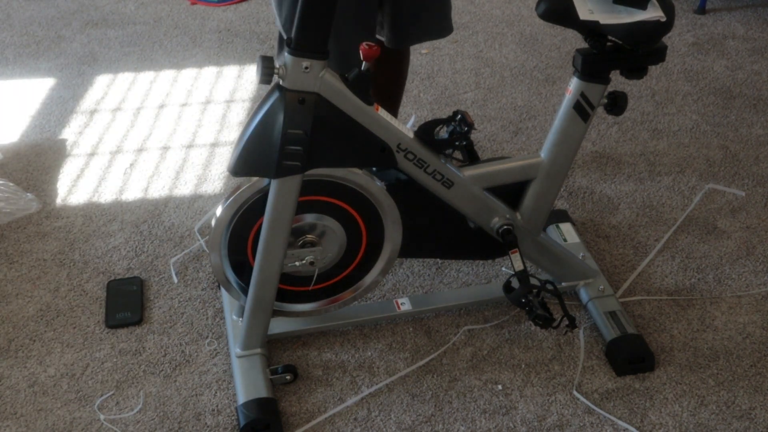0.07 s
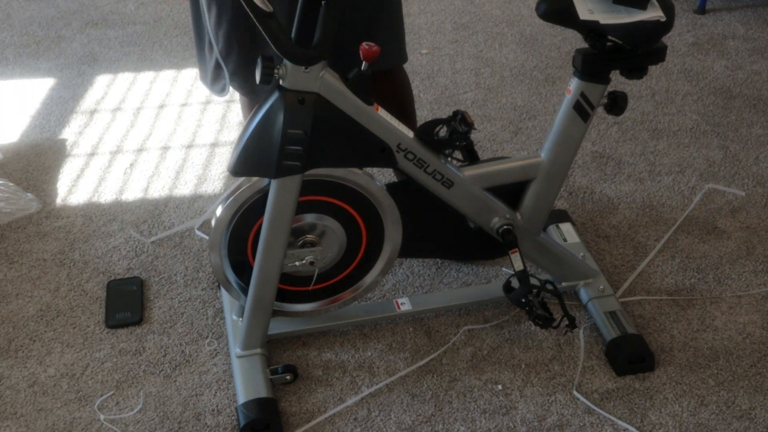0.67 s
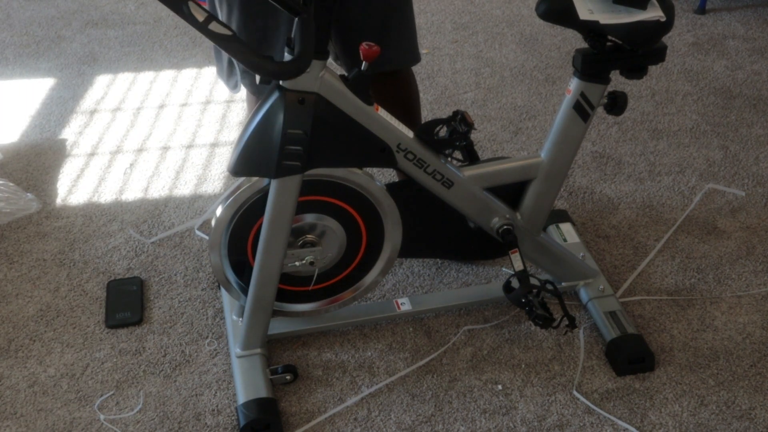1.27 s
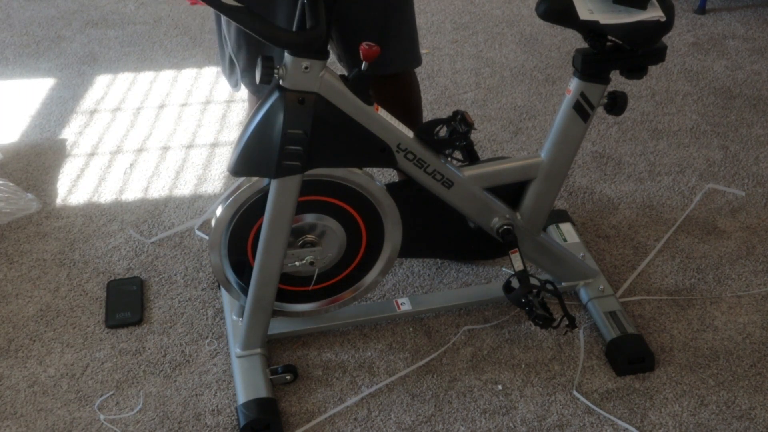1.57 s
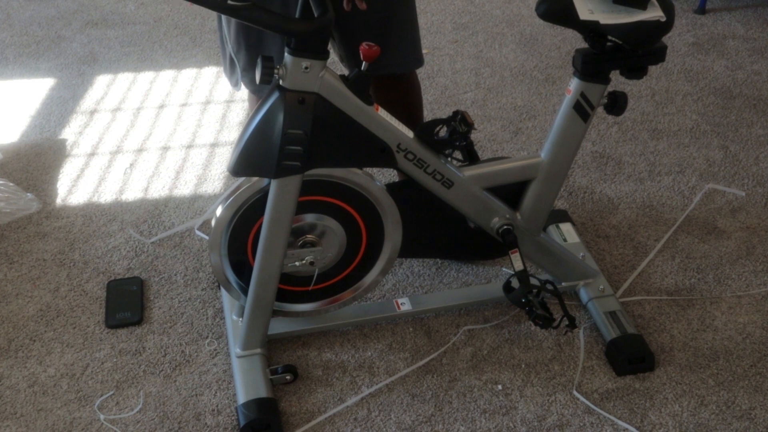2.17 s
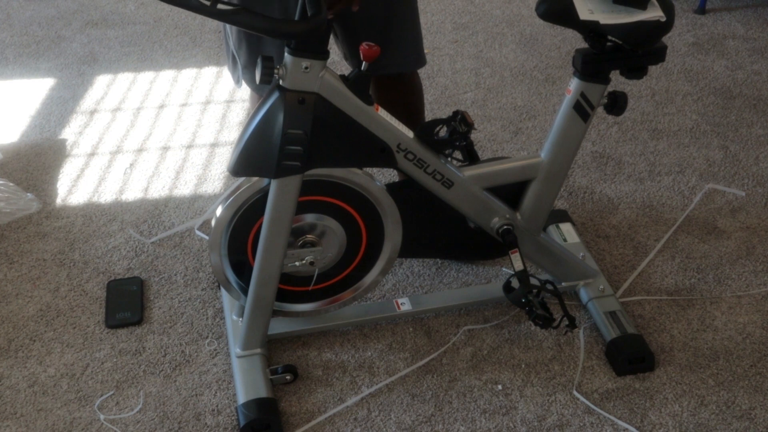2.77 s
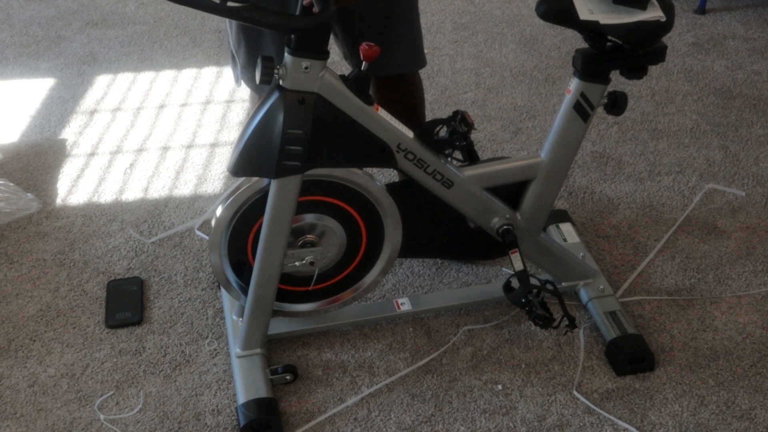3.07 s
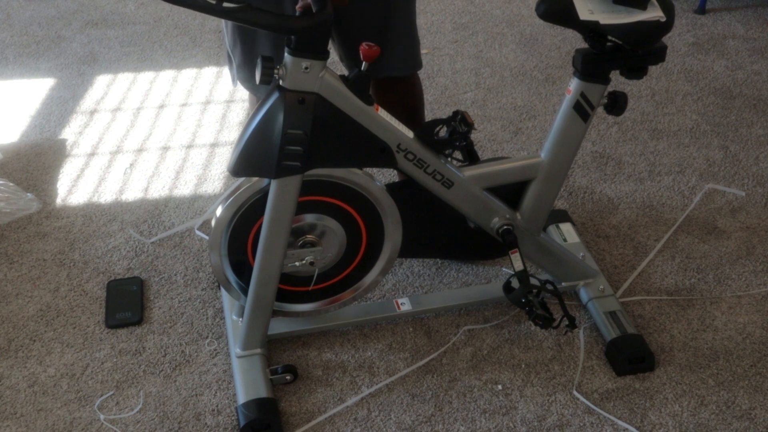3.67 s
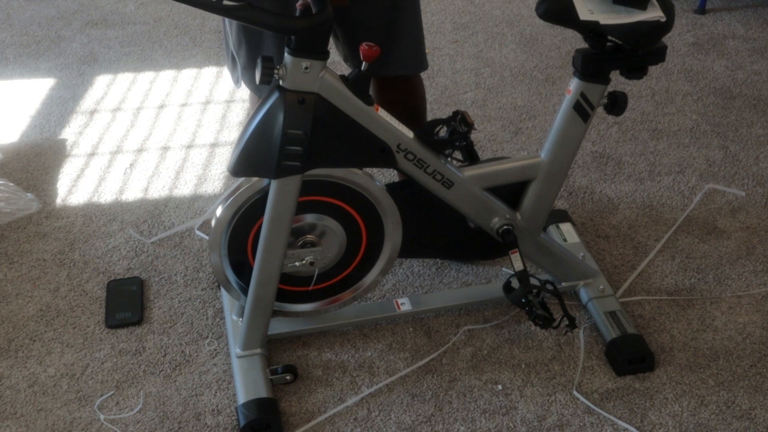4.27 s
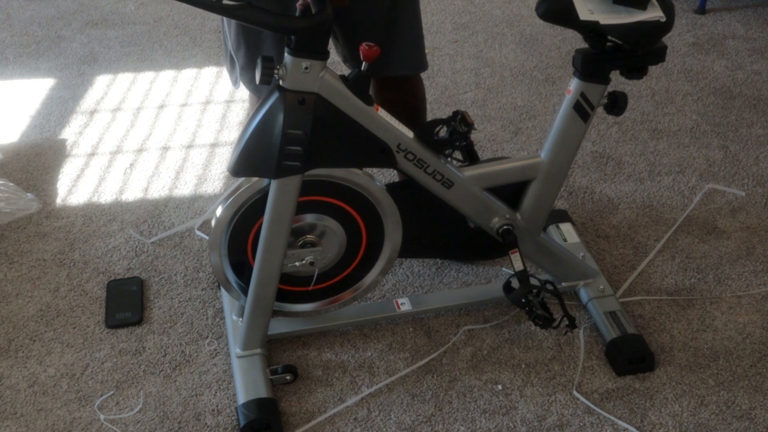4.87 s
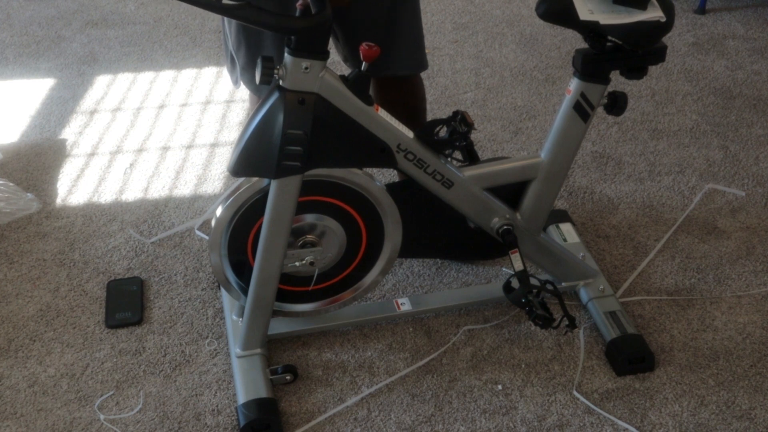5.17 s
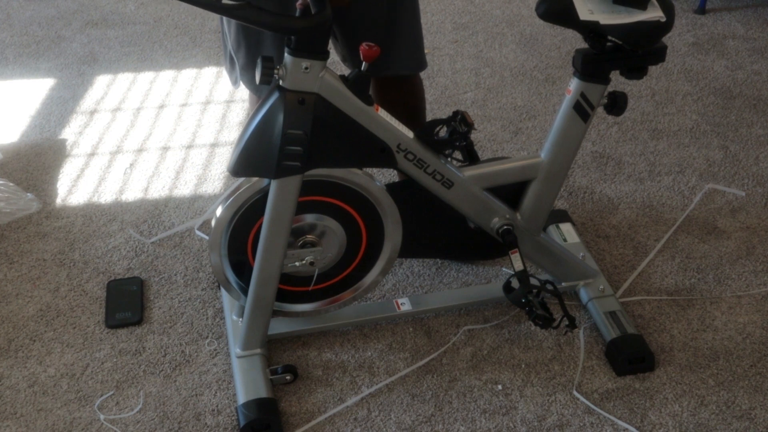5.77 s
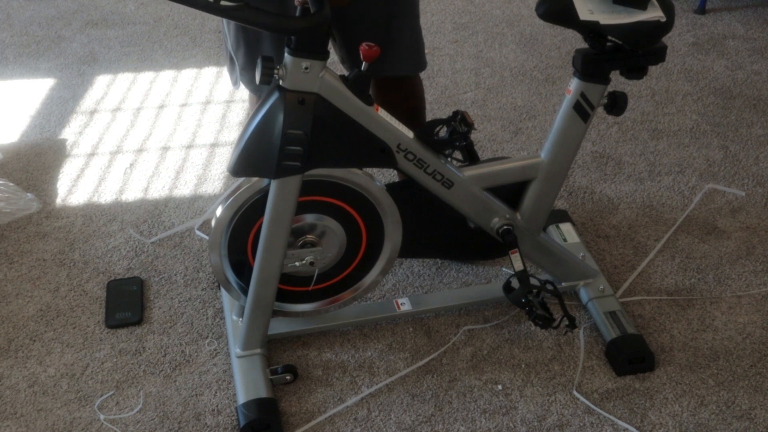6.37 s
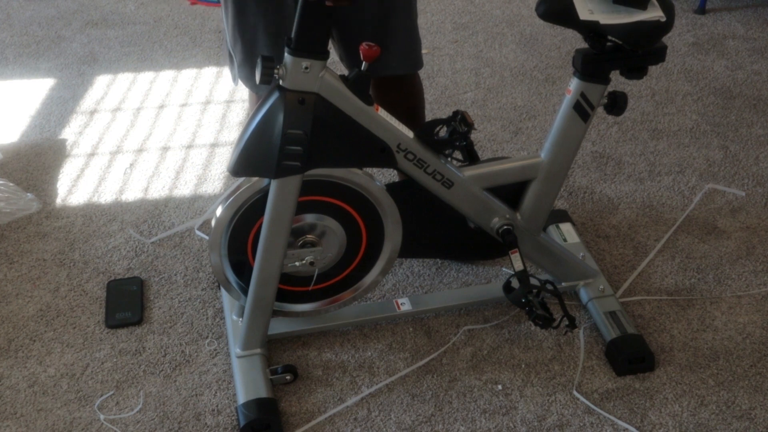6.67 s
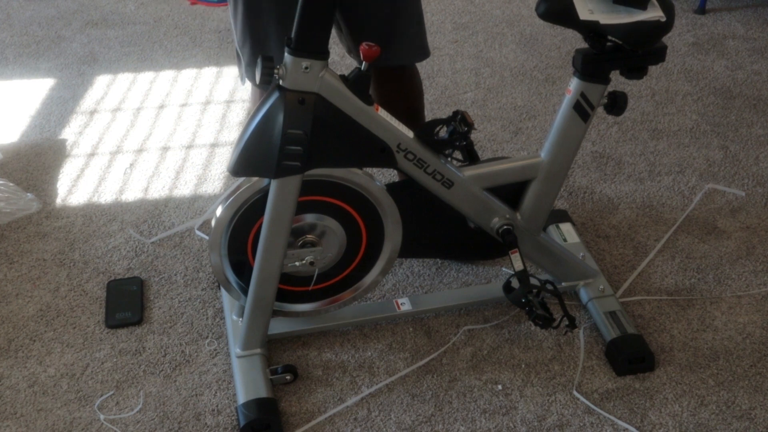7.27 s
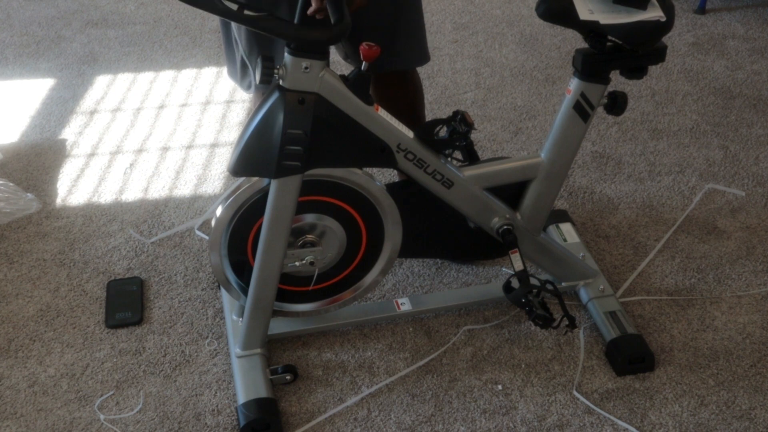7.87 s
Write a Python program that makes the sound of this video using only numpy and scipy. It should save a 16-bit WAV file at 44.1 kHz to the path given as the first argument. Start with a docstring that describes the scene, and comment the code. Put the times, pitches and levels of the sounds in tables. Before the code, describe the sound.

A handlebar post is fitted into an exercise bike's steel frame in a carpeted room, fairly quiet and near. Light knocks and a brief rub open, with a small clink at about 0.8 seconds. Soft, hollow bumps on plastic covers follow from 1.1 to 2.5 seconds. Around 3 seconds the post chatters in its tube, each clack sitting on a thud. Sharp, pitched taps on the rim stand out between 3.5 and 3.8 seconds. More knocks, short gritty scrapes and a brief sliding hiss follow, with bright clacks and small steel pings from 4.7 to 5.2 seconds. A dull bump and a scraping double knock come near 6 seconds, two more knocks near 7, then a thin ping and faint last touches until 8. Underneath are a soft deep rumble and low handling noise, with a very faint wavering hum around 1.7 and 6.5 seconds.

```python
"""Knocks, chatter and rubbing: a handlebar post is fitted into the steel frame of an exercise bike.
Each contact rings the frame's modes; the post sticks and slips in its tube and taps the rim.
Small steel fittings ping, a loose part clinks, hands bump the plastic covers. The room is carpeted.
Underneath: a deep rumble, the murmur of handling and a faint hum that comes and goes."""
import sys
import numpy as np
from scipy import signal
from scipy.fft import rfft, irfft, next_fast_len
from scipy.io import wavfile
from scipy.ndimage import uniform_filter1d

SR = 44100
rng = np.random.default_rng(int(sys.argv[2]) if len(sys.argv) > 2 else 0)


def digitize_waveform(pressure):
    """Quantize a signal to 16-bit integers and store it at the path in sys.argv[1].

    Rows of a 2-D input are taken as channels; values are limited to [-1, 1].
    """
    field = np.atleast_2d(pressure).T
    bounded = np.clip(field, -1, 1)
    quanta = np.round(bounded * 32767).astype(np.int16)
    wavfile.write(sys.argv[1], SR, quanta)


N = 353726
TAIL = SR // 2   # samples per blow or echo tail
AGE_S = np.arange(TAIL) / SR
TIME_S = np.arange(N) / SR

# steel-on-steel contact spectrum: freq_hz, gain_db
CONTACT_SPECTRUM = [(200, -19.5), (500, -15.5), (730, -2), (1000, -1), (1600, -4.5), (2100, -3), (3000, -2),
                    (4500, -7.5), (6500, -8.5), (12000, -35)]


def knocks(spots):
    """The post knocks in its tube and shakes the frame: a clack on top of a thud."""
    # start_s, clack_db, edge_hz, part_hz, wet_db, thud_db, thud_hz
    blows = [(0.056, -55.5, 2180, 980, -1.5, -53.5, 475), (0.078, -58, 2170, 945, 3, -59, 430),
             (0.556, -65.5, 2080, 1950, 11, -50.5, 290), (0.604, -68.5, 2070, 900, 5, -64.5, 395),
             (1.251, -75, 1900, 1450, 3.5, -62, 330), (1.933, -71.5, 3230, 1600, 12, -74.5, 338),
             (2.157, -63.5, 3160, 2730, 13.5, -57, 350), (2.364, -54.5, 2190, 1960, 1.5, -51, 400),
             (2.470, -62.5, 2340, 1900, 5, -48, 280), (2.841, -63.5, 1810, 800, 8, -60.5, 280),
             (2.906, -50, 1670, 1080, 10, -51.5, 357), (2.936, -43, 3520, 1010, -0.5, -49.5, 300),
             (3.006, -49.5, 2000, 980, -1.5, -49.5, 290), (3.044, -51, 2380, 970, 4, -48, 360),
             (3.095, -57.5, 2304, 930, 0, -55.5, 280), (3.401, -64, 2280, 1720, 4.5, -54, 263),
             (3.523, -52, 3030, 1830, 2.5, -49, 352), (3.678, -46, 3390, 1580, 11, -46.5, 320),
             (3.769, -44.5, 5800, 1670, -3.5, -54, 409), (3.968, -60.5, 2560, 1740, 2, -58.5, 345),
             (4.076, -51.5, 1840, 1365, 4.5, -51.5, 359), (4.302, -51, 3270, 820, 2, -51, 458),
             (4.719, -47.5, 3520, 1500, -1.5, -46.5, 400), (4.776, -44, 4140, 1460, 1, -59, 500),
             (4.798, -48, 3270, 1500, 1, -48.5, 456), (4.848, -55, 5700, 3410, 1, -47, 362),
             (5.061, -53.5, 5170, 2460, 10, -46, 407.4), (5.094, -43.5, 6300, 1750, -2, -49.5, 244),
             (5.165, -53, 2580, 1160, 3, -65.5, 260), (5.197, -40, 4560, 2100, -5.5, -60.5, 390),
             (5.218, -51.5, 4540, 2000, -1, -66.5, 280), (5.44, -55, 1550, 1245, -2.5, -63.5, 448),
             (6.067, -44, 4200, 1570, -3.5, -45, 472), (6.085, -47.5, 4000, 1130, 4, -51, 490),
             (6.843, -54, 2550, 1080, 7, -44, 390), (7.004, -43.5, 3200, 1600, 0, -50, 417),
             (7.322, -63, 4540, 1400, 15, -54, 527), (7.715, -70.5, 1200, 1040, -2, -69, 440),
             (7.989, -66, 1075, 980, -1, -80, 300)]
    out = np.zeros(N)
    for start_s, clack_db, edge_hz, part_hz, wet_db, thud_db, thud_hz in blows:
        hard = clack(spots, edge_hz, part_hz, ring_db=10, wet_db=wet_db)
        add(out, start_s - .001, from_db(clack_db) * hard)
        add(out, start_s - .002, from_db(thud_db) * thud(spots, thud_hz))
    return out


def clack(spots, edge_hz, part_hz, ring_db, wet_db, t60_s=.013, part_width_hz=380):
    """A clack rings the struck part and the frame; a steep low-pass makes it duller or brighter."""
    crunch = colour(contact(t60_s), CONTACT_SPECTRUM, ripple_db=3.5)
    part = resonance(crunch, part_hz, part_width_hz, ring_db)
    rung = cut(frame(part), edge_hz, "low", order=10)
    return attack_one(in_room(rung, wet_db, spots))


def thud(spots, pitch_hz, t60_s=.049, span_ratio=1.427, wet_db=4.5, boom_hz=137, boom_t60_s=.19):
    """Hollow answer of frame and covers; deep thuds stir the lowest bending mode, the boom, most."""
    hollow = cut(frame(contact(t60_s)), pitch_hz * span_ratio, "low", order=5)
    hollow = cut(hollow, pitch_hz / span_ratio, "high", order=3)
    boom = np.sin(2 * np.pi * boom_hz * AGE_S) * decay(boom_t60_s, -2)
    return attack_one(in_room(hollow, wet_db, spots)) + (2 * boom_hz / pitch_hz) ** 2 * boom


def contact(t60_s, rise_s=.0005):
    """Rough surfaces meet in a short crunch of noise."""
    return rng.standard_normal(TAIL) * decay(t60_s) * onset(rise_s)


def frame(x):
    """Whatever touches the tubes sounds through their modes."""
    # freq_hz, width_hz, boost_db
    modes = [(147, 60, 15), (219, 71, -1.25), (360, 23, 3.5), (447, 14, 6), (637, 22, 8.5), (948, 6, 7.5),
             (1140, 130, 6), (1503, 220, 6.5), (1780, 42, 4.5), (1983, 220, 3), (2580, 40, 5.5),
             (2567, 71, 2.5), (3135, 45, 5), (3240, 99, 2)]
    for freq_hz, width_hz, boost_db in modes:
        x = resonance(x, freq_hz, width_hz, boost_db)
    return x


def taps(spots, firm_db=-36, firm_edge_hz=3430, db_per_octave=27):
    """The post taps the tube's rim: dry, pitched, brighter with force, hardly shaking the frame."""
    # start_s, level_db, pitch_hz
    rim_taps = [(3.467, -48, 1790), (3.549, -35, 1906), (3.635, -48.5, 1605), (3.749, -41, 1720),
                (4.002, -58.5, 1445), (4.997, -62, 1610)]
    out = np.zeros(N)
    for start_s, level_db, pitch_hz in rim_taps:
        edge_hz = firm_edge_hz * 2 ** ((level_db - firm_db) / db_per_octave)
        rim = clack(spots, edge_hz, pitch_hz, ring_db=28, wet_db=-8, t60_s=.026, part_width_hz=180)
        shake = from_db(-16) * thud(spots, pitch_hz=420)
        add(out, start_s - .001, from_db(level_db) * (rim + shake))
    return out


def rubs(spots, bind_trim_db=-1.5):
    """The post rubs hollowly where it binds and hisses where it slides freely; the first row is no bind but a
    brief gritty burst with the same sound that opens the scene."""
    # start_s, end_s, relative_db, low_hz, high_hz
    binds = [(0, 0.031, -70, 900, 3400), (0.037, 0.126, -61, 797, 2230), (2.349, 2.394, -59, 885, 2270),
             (2.822, 2.90, -67, 1290, 1840), (2.926, 2.956, -49, 1600, 2600),
             (3.648, 3.79, -48.5, 1100, 3080), (3.805, 3.968, -69, 960, 2017),
             (3.954, 4.245, -62, 1163, 1750), (4.286, 4.32, -57.5, 900, 2640),
             (4.686, 4.815, -55.5, 1160, 3420), (4.826, 5.09, -69, 1080, 2040),
             (5.428, 5.462, -65.5, 1020, 2060), (5.645, 5.847, -67, 1100, 2020),
             (6.047, 6.106, -48.5, 892, 3680), (6.831, 6.877, -55, 800, 2040),
             (6.93, 7.03, -62, 1130, 1880), (7.351, 7.484, -69, 1232, 1600),
             (7.596, 7.669, -80.5, 1370, 3500)]
    # start_s, end_s, level_db
    slides = [(3.662, 3.79, -67), (4.764, 4.962, -61), (5.759, 5.847, -81), (6.038, 6.106, -63),
              (7.306, 7.386, -71)]
    out = np.zeros(N)
    for start_s, end_s, relative_db, low_hz, high_hz in binds:
        rub = stick_slip(spots, end_s - start_s, low_hz, high_hz, slips_per_s=410, wet_db=-3)
        add(out, start_s, from_db(relative_db + bind_trim_db) * rub)
    for start_s, end_s, level_db in slides:
        hiss = stick_slip(spots, end_s - start_s, low_hz=3080, high_hz=11500, slips_per_s=340, wet_db=0)
        add(out, start_s, from_db(level_db) * hiss)
    return out


def stick_slip(spots, duration_s, low_hz, high_hz, slips_per_s, wet_db, grit_db=4.5, ring_db=7.5):
    """Tube on tube sticks and slips: uneven clicks ring the hollow tube and the frame; rms 1."""
    # freq_hz, width_hz, relative_db
    tube_modes = [(1250, 53, 1.5), (1495, 94, -3.5), (1800, 26, -2)]
    length = max(round(duration_s * SR), SR // 100)
    sizes = from_db(grit_db * np.minimum(rng.exponential(1, length), 3)) * rng.choice([-1, 1], length)
    slips = sizes * (rng.random(length) < slips_per_s / SR)
    friction = (slips + .072 * rng.standard_normal(length)) * signal.windows.tukey(length, .5)
    scrape = colour(np.pad(friction, (0, TAIL)), CONTACT_SPECTRUM, ripple_db=3.5)
    for freq_hz, width_hz, relative_db in tube_modes:
        scrape = resonance(scrape, freq_hz, width_hz, ring_db + relative_db)
    scrape = cut(frame(scrape), low_hz, "high", order=5)
    scrape = cut(scrape, high_hz, "low", order=10)
    sound = in_room(scrape, wet_db, spots)
    return sound / np.std(sound[:length])


def bumps(spots, nudge_count=7, nudge_from_s=1.42, nudge_span_s=.9, nudge_db=-60, nudge_hz=305):
    """Soft blows and a run of light nudges on the plastic covers: thuds with a trace of clack."""
    # start_s, level_db, pitch_hz
    blows = [(0.558, -47, 243), (1.149, -49, 268), (1.224, -47, 311), (1.285, -44.5, 288),
             (1.325, -55.5, 327), (2.386, -50.5, 364), (2.459, -39.5, 271), (5.902, -38.5, 350),
             (5.957, -47.5, 210)]
    out = np.zeros(N)
    slots = np.arange(nudge_count) + rng.random(nudge_count)
    starts_s = nudge_from_s + nudge_span_s * slots / nudge_count
    nudges = [(start_s, rng.normal(nudge_db, 2.5), nudge_hz) for start_s in starts_s]
    for start_s, level_db, pitch_hz in blows + nudges:
        touch = from_db(-31) * clack(spots, edge_hz=900, part_hz=810, ring_db=5, wet_db=2.5)
        cover = thud(spots, pitch_hz, t60_s=.04, span_ratio=1.18, wet_db=2)
        add(out, start_s - .002, from_db(level_db) * (cover + touch))
    return out


def pings(spots, trim_db=-7, max_t60_s=.14):
    """Steel fittings tick and ring with the modes near one pitch; fingers limit the ring time."""
    # start_s, relative_db, centre_hz, spread_octaves, tick_re_ring_db
    touches = [(0.603, -72, 3830, .5, -16), (1.186, -60.5, 10670, 0.072, -1), (1.253, -63, 3076, 0.042, 0),
               (1.327, -76, 4100, .45, -1), (2.937, -63, 4270, 0.17, 2), (3.547, -63.5, 5375, 0.16, 0),
               (3.69, -61, 6200, 0.42, -4), (3.750, -61.5, 6340, .28, 0.5), (3.768, -68.5, 7870, 0.38, 1),
               (4.126, -69.5, 3000, 0.2, 5.5), (4.635, -71, 3800, 0.7, -1), (4.846, -53.5, 3310, 0.17, 7.5),
               (5.093, -47.5, 8470, 0.038, -3), (5.096, -54.5, 6270, .12, 2), (5.097, -72, 12510, 0.09, -5),
               (5.198, -59.5, 5386, 0.24, 2.5), (6.844, -71.5, 4700, 0.25, -3.5),
               (6.986, -47.5, 3440, 0.16, -3.5), (6.993, -62, 5640, 0.18, -8.5),
               (7.037, -68.5, 8080, 0.46, -10), (7.324, -53.5, 3860, 0.32, -3.5),
               (7.331, -53, 9960, 0.15, 4.5), (7.334, -63, 6900, 0.17, 5.5), (7.775, -75.5, 4640, 0.57, 1)]
    # freq_hz, gain_db, undamped_t60_s
    modes = [(745, -3, 0.16), (850, -11, .14), (2413, 9, 0.093), (2800, 8.5, 0.26), (2970, -2, 0.088),
             (3100, -0.5, 0.044), (3420, -3.5, 0.1), (3670, 0, 0.022), (4160, -1.5, 0.22), (5290, -12, .12),
             (5410, 1, 0.2), (6200, -6.5, 0.085), (5800, 3.5, 0.022), (6300, -9, 0.21), (6930, -7.5, 0.052),
             (7980, -6.5, 0.08), (8690, -4, .1), (9500, -6.5, 0.032), (9120, -14, 0.16),
             (9480, -5.5, 0.079), (10000, -6.5, 0.083), (10690, 3, 0.04), (11050, -5, 0.12),
             (12600, 7, .12), (14700, -2, 0.15)]
    out = np.zeros(N)
    for start_s, relative_db, centre_hz, spread_octaves, tick_re_ring_db in touches:
        ring = 0
        for freq_hz, gain_db, undamped_t60_s in modes:
            weight = np.exp(-.5 * (np.log2(freq_hz / centre_hz) / spread_octaves) ** 2)
            if weight > .001:
                t60_s = min(undamped_t60_s, max_t60_s)
                ring = ring + weight * mode(freq_hz, rng.normal(gain_db, 1.9), t60_s)
        band_hz = centre_hz * 2 ** np.array([-spread_octaves, spread_octaves])
        tick = cut(contact(t60_s=.0092), band_hz, "band", order=3)
        ring = attack_one(in_room(ring * onset(rise_s=.00037), wet_db=-4, spots=spots))
        tick = attack_one(in_room(tick, wet_db=-1, spots=spots))
        add(out, start_s, from_db(relative_db + trim_db) * (ring + from_db(tick_re_ring_db) * tick))
    return out


def clinks(spots, hand_damping=2.6):
    """A loose steel part ticks and rings with all its modes, damped by the hand."""
    # start_s, level_db
    touches = [(0.767, -59.5), (1.936, -71)]
    # freq_hz, gain_db, undamped_t60_s
    modes = [(750, -0.5, 0.13), (2350, -12.5, 0.25), (2410, 1, 0.13), (3130, -17, 0.18), (3370, -15, 0.12),
             (3690, -2.5, 0.076), (4129, -18, 0.28), (9720, -8, 0.063)]
    out = np.zeros(N)
    for start_s, level_db in touches:
        ring = sum(mode(freq_hz, rng.normal(gain_db, 1.1), undamped_t60_s / hand_damping)
                   for freq_hz, gain_db, undamped_t60_s in modes)
        ring = attack_one(in_room(ring * onset(rise_s=.0009), wet_db=2, spots=spots))
        tick = from_db(-7) * clack(spots, edge_hz=4200, part_hz=850, ring_db=16, wet_db=4)
        add(out, start_s, from_db(level_db) * (ring + tick))
    return out


def murmur():
    """Hands and parts moving on the frame stir its low modes."""
    # freq_hz, density_db
    spectrum = [(50, -11), (100, 0.5), (140, 3), (170, -1.5), (220, 2), (300, -2.5), (440, -3.5),
                (520, -16), (650, -21.5), (900, -28), (1500, -50), (3000, -69.5)]
    # time_s, relative_db
    levels = [(0.0, -60), (0.24, -75), (1.18, -67), (1.29, -59.5), (1.96, -65), (2.41, -57.5), (2.57, -70),
              (2.86, -63), (3.02, -58), (3.35, -65.5), (3.55, -52.5), (4.4, -63.5), (4.96, -57.5),
              (5.58, -70), (5.99, -59), (6.66, -64), (6.99, -57), (8.02, -80)]
    # freq_hz, width_hz, boost_db
    modes = [(137, 16, 3.5), (216, 18, 0), (339, 8.3, 2)]
    sound = swelling_noise(spectrum, levels, trim_db=-1.5, even_s=.076)
    for freq_hz, width_hz, boost_db in modes:
        sound = resonance(sound, freq_hz, width_hz, boost_db)
    return sound


def rumble(split_hz=43.8, upper_rest_db=-33, upper_swell_share=.61):
    """Deep noise that swells most below the split and is steadier above it."""
    # freq_hz, density_db
    spectrum = [(6, -18), (12, -4.5), (18, 5), (25, -11.5), (35, -15.5), (50, -20), (70, -27.5),
                (100, -31.5), (150, -46.5), (250, -55.5), (500, -89.5)]
    # time_s, relative_db
    levels = [(0.0, -30.5), (0.08, -33), (0.22, -41.5), (0.75, -38), (1.0, -32.5), (1.58, -26),
              (1.901, -42.5), (2.121, -29.5), (2.451, -32.5), (2.65, -38), (2.951, -38.5), (3.3, -30.0),
              (4.15, -32), (5.15, -34.5), (5.401, -38), (5.9, -39.5), (6.398, -32.5), (6.751, -32.1),
              (7.25, -36), (7.58, -30), (7.8, -39), (8.02, -37.5)]
    calmer = [(time_s, upper_rest_db + upper_swell_share * (db - upper_rest_db)) for time_s, db in levels]
    deep = swelling_noise(spectrum, levels, trim_db=1, even_s=.12)
    upper = swelling_noise(spectrum, calmer, trim_db=0, even_s=.4)
    return cut(deep, split_hz, "low", order=3) + cut(upper, split_hz, "high", order=3)


def hum():
    """Narrow noise bands swell and fade as faint, wavering tones."""
    # start_s, end_s, pitch_hz, width_hz, level_db
    swells = [(1.3, 2.092, 474, 53, -67), (1.62, 1.97, 536, 27, -77), (6.15, 6.798, 442.4, 9.2, -69.5),
              (6.3, 6.813, 652, 34, -74)]
    out = np.zeros(N)
    for start_s, end_s, pitch_hz, width_hz, level_db in swells:
        length = round((end_s - start_s) * SR)
        band_hz = [pitch_hz - width_hz / 2, pitch_hz + width_hz / 2]
        tone = cut(rng.standard_normal(length + TAIL), band_hz, "band", order=2)[TAIL:]
        add(out, start_s, from_db(level_db) * rms_one(tone) * signal.windows.tukey(length, .5))
    return out


def swelling_noise(spectrum, levels, trim_db, even_s):
    """Coloured noise, evened over even_s, that follows a level curve."""
    noise = colour(rng.standard_normal(N + TAIL), spectrum)
    steady = noise / np.sqrt(uniform_filter1d(noise ** 2, int(even_s * SR)))
    return steady[TAIL:] * from_db(np.interp(TIME_S, *np.transpose(levels)) + trim_db)


def room_echoes(early_t60_s=.19, early_db=4.5, gap_s=.0026):
    """Echoes of one spot, energy 1: dense first reflections and a tail whose treble dies first."""
    # freq_hz, t60_s
    reverb_times = [(100, .42), (400, .33), (1500, .32), (4000, .3), (12000, .26)]
    white, tail = rng.standard_normal(TAIL), 0
    edges_hz = np.geomspace(50, 19000, num=7)
    for low_hz, high_hz in zip(edges_hz, edges_hz[1:]):
        t60_s = at_hz(reverb_times, np.sqrt(low_hz * high_hz))
        tail = tail + cut(white, [low_hz, high_hz], "band", order=2) * decay(t60_s)
    early = rng.standard_normal(TAIL) * decay(early_t60_s, early_db)
    build_up = 1 - np.exp(-(AGE_S / gap_s) ** 2)
    return rms_one((tail + early) * build_up) / np.sqrt(TAIL)


def in_room(x, wet_db, spots):
    """Direct sound plus the echoes of a random spot."""
    return x + from_db(wet_db) * signal.fftconvolve(x, spots[rng.integers(len(spots))])[:len(x)]


def colour(x, spectrum, ripple_db=0, mode_spacing_hz=70):
    """Minimum-phase filter; the ripple stands for modes that a contact point favours or misses."""
    size = next_fast_len(len(x)) * 2
    freq_hz = np.fft.rfftfreq(size, 1 / SR)
    mode_index = np.sqrt(freq_hz * 500) * 2 / mode_spacing_hz   # spacing holds at 500 Hz, widens above
    ripple = np.interp(mode_index, np.arange(400), rng.standard_normal(400))
    gain = from_db(at_hz(spectrum, freq_hz) + ripple_db * np.clip(ripple, -2, 2))
    cepstrum = irfft(np.log(gain), size)
    cepstrum[1:size // 2] *= 2
    cepstrum[size // 2 + 1:] = 0
    return irfft(rfft(x, size) * np.exp(rfft(cepstrum)), size)[:len(x)]


def resonance(x, freq_hz, width_hz, boost_db):
    """Peaking filter for one mode."""
    damp, cosine = np.pi * width_hz / SR, np.cos(2 * np.pi * freq_hz / SR)
    lift = damp * from_db(boost_db)
    return signal.lfilter([1 + lift, -2 * cosine, 1 - lift], [1 + damp, -2 * cosine, 1 - damp], x + 1e-18)


def cut(x, edge_hz, kind, order):
    """Butterworth filter."""
    sos = signal.butter(order, np.clip(edge_hz, 10, .45 * SR), kind, fs=SR, output="sos")
    return signal.sosfilt(sos, x + 1e-18)


def mode(freq_hz, gain_db, t60_s):
    """Decaying sine of random phase."""
    return decay(t60_s, gain_db) * np.sin(2 * np.pi * (freq_hz * AGE_S + rng.random()))


def decay(t60_s, start_db=0):
    """Exponential fall."""
    return from_db(start_db - 60 * AGE_S / t60_s)


def onset(rise_s):
    """Exponential rise to 1."""
    return 1 - np.exp(-AGE_S / rise_s)


def from_db(db):
    """Decibels to gain."""
    return 10 ** (np.asarray(db) / 20)


def rms_one(x):
    """Scale to rms 1."""
    return x / np.sqrt(np.mean(x ** 2) + 1e-30)


def attack_one(x):
    """Scale to rms 1 over the first 20 ms."""
    return x / np.sqrt(np.mean(x[:SR // 50] ** 2) + 1e-30)


def at_hz(points, freq_hz):
    """Read a table on a log-frequency axis."""
    known_hz, values = np.transpose(points)
    return np.interp(np.log(np.maximum(freq_hz, 1)), np.log(known_hz), values)


def add(out, start_s, sound):
    """Mix a sound in at start_s."""
    start = max(round(start_s * SR), 0)
    out[start:start + len(sound)] += sound[:max(N - start, 0)]


def suppress(x, threshold_db=-80, depth_db=-4, size=1024):
    """Noise suppressor: narrow bands near hiss level are turned down, so faint tails end early."""
    overlap = size * 3 // 4
    spectra = signal.stft(x, nperseg=size, noverlap=overlap)[2]
    power = uniform_filter1d(np.abs(spectra) ** 2, size=5, axis=-1) * size / 1.5
    clearness = (power / (power + from_db(threshold_db) ** 2)) ** 2
    gain = np.maximum(clearness, from_db(depth_db))
    return signal.istft(spectra * gain, nperseg=size, noverlap=overlap)[1][..., :N]


def scene():
    """Work on the frame over the low sounds of the room and a faint hiss; mono."""
    spots = [room_echoes() for _ in range(12)]
    work = knocks(spots) + taps(spots) + bumps(spots) + pings(spots) + clinks(spots) + rubs(spots)
    hiss = from_db(-90) * rng.standard_normal(N)
    return (work + rumble() + murmur() + hum() + hiss)[None]


def record(dry):
    """Noise suppression, then a steep low-pass."""
    cutoff_hz = 14500
    return signal.sosfilt(signal.ellip(10, .1, 80, cutoff_hz, fs=SR, output="sos"), suppress(dry))


dry = scene()
out = record(dry)
digitize_waveform(out)
```